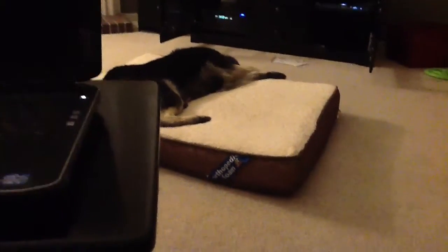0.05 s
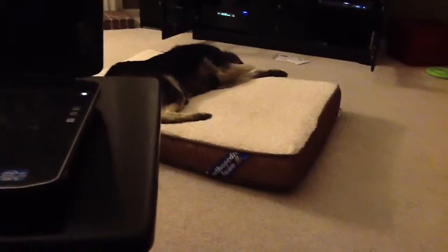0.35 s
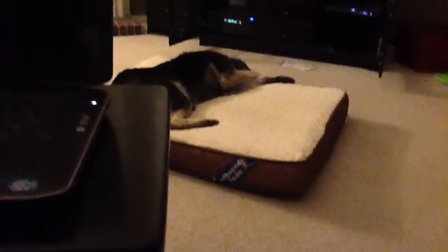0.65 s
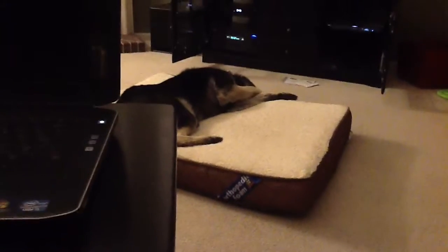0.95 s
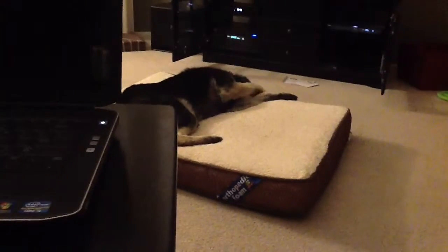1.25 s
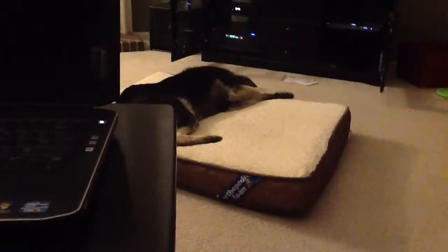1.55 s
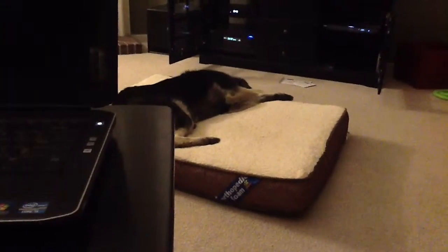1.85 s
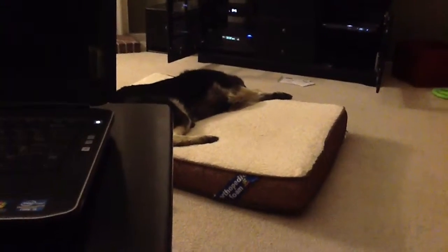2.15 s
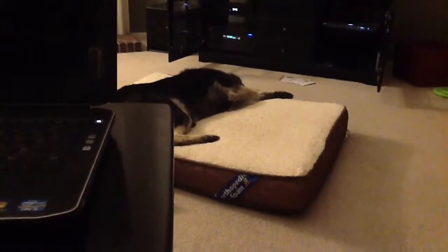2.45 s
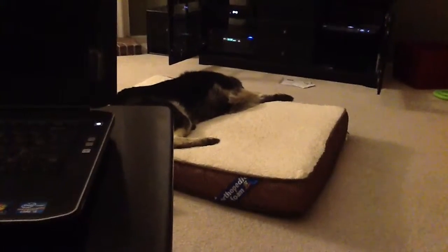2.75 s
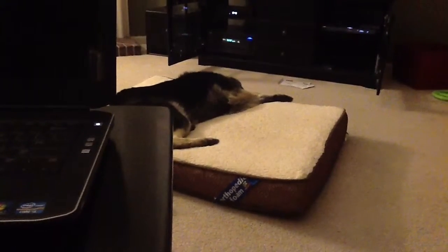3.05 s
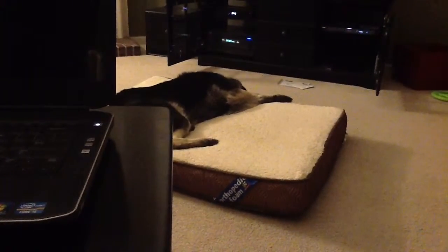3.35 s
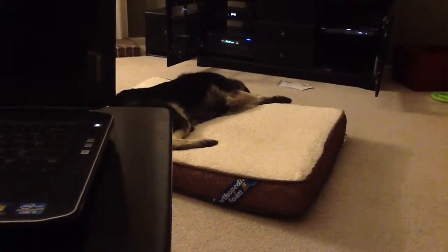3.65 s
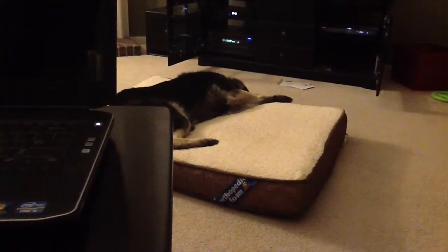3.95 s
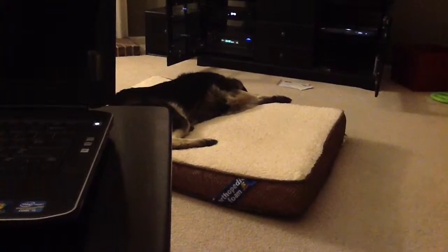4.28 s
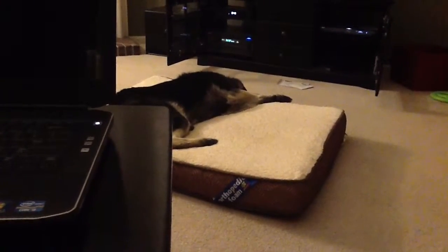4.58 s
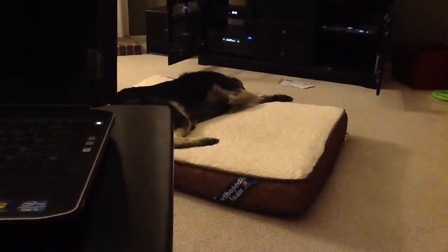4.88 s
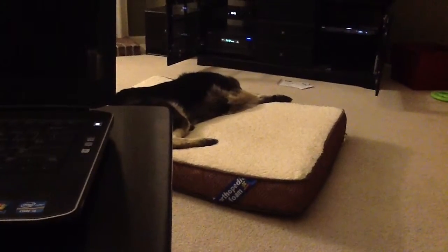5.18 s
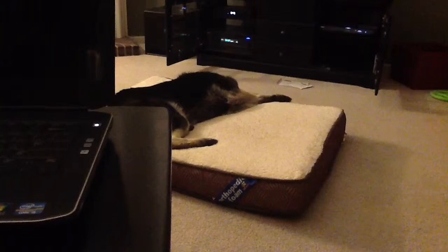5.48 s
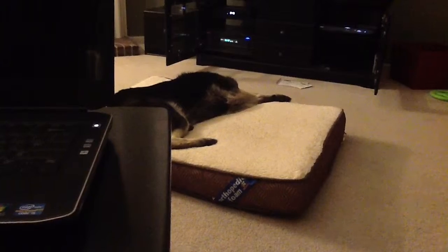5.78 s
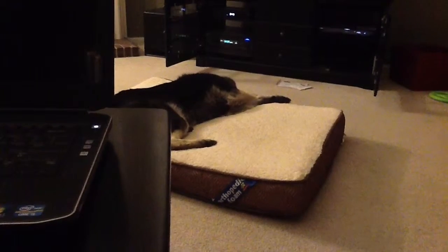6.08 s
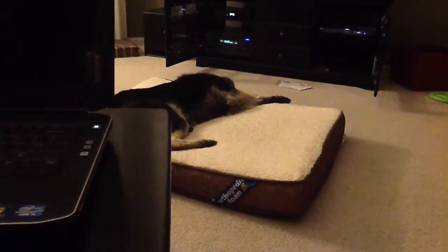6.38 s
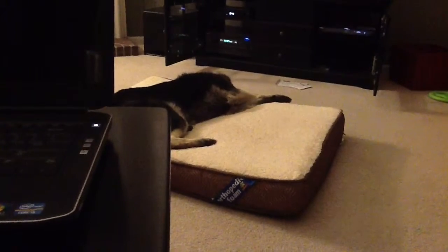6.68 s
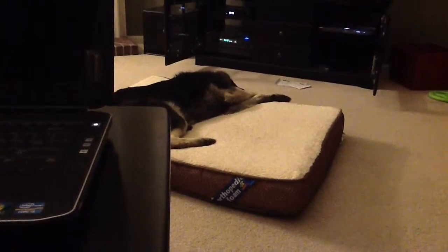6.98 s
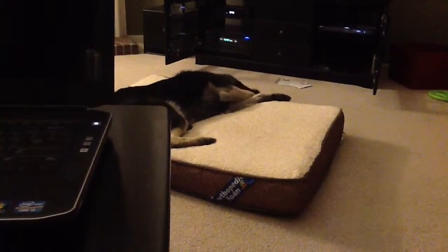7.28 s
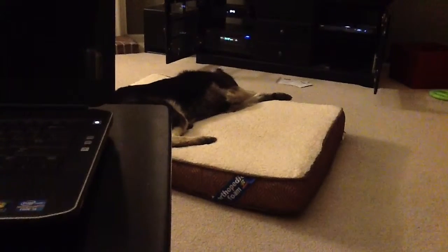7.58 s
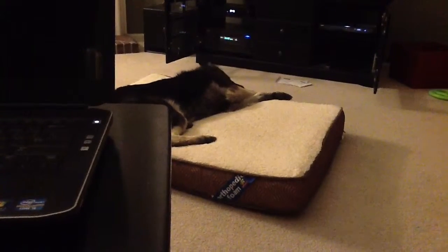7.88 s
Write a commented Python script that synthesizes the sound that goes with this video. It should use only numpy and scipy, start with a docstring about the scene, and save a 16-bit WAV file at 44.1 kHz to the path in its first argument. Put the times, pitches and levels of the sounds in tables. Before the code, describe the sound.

High rubber toy squeaks come in uneven pairs as a dog bites a ball, with brief air hisses and soft knocks.

```python
"""A carpeted living room, where a dog lying across the room chews a squeaky ball. Each bite drives air out
through one reed, and air sucked back in sounds a second one; pitch, strength and overtones follow the air
pressure. Some bites only hiss. The room smears the glides, and jaws and paws knock softly over the quiet murmur
of the house."""
import sys
import numpy as np
from scipy import signal
from scipy.fft import rfft, irfft, next_fast_len
from scipy.io import wavfile
from scipy.ndimage import map_coordinates

SR = 44100
rng = np.random.default_rng(int(sys.argv[2]) if len(sys.argv) > 2 else 0)


def pcm_store(signal):
    """Save signal as 16-bit PCM."""
    levels = np.round(np.clip(np.atleast_2d(signal), -1, 1) * 32767)
    wavfile.write(sys.argv[1], SR, levels.astype(np.int16).T)


N = 349713

# Colour of the room tone. Each row: frequency in Hz, relative density in dB.
ROOM_TONE_COLOUR = [(18, -68), (30, -27), (64, -27), (81, -15.5), (147, -1.5), (212, -4), (255, -1.5),
                    (283, -5.5), (322, -3.5), (377, -6.5), (602, -9), (1420, -13.5), (2000, -13.5),
                    (4610, -15), (15300, -15.5)]
# Decay of the room's tail. Each row: frequency in Hz, t60 in seconds.
TAIL_T60 = [(200, 0.78), (1000, 0.49), (3000, 0.51), (6000, 0.43), (12000, 0.2)]
# Knocks of jaws, paws and ball. Each row: start in seconds, level at the strike in dB, centre in Hz,
# width in octaves, t60 in seconds.
KNOCK_HITS = [(0.271, -58.5, 1870, 0.37, 0.055), (0.452, -54, 6000, 0.68, .015),
              (1.207, -56, 330, 0.45, 0.037), (1.845, -49.5, 330, 0.63, 0.021),
              (2.121, -43.5, 212, 0.33, 0.017), (2.359, -58, 980, 0.099, 0.028),
              (2.42, -55, 970, 0.23, 0.044), (3.455, -47.5, 430, 0.71, 0.015),
              (7.016, -54, 1080, 0.42, 0.031), (7.04, -57, 990, 0.57, 0.062),
              (7.204, -62, 139, 0.45, 0.091), (7.244, -61, 150, 0.9, 0.16), (7.332, -54.5, 400, 1, 0.1),
              (7.359, -54, 600, 0.48, 0.036), (7.378, -60, 400, 0.98, 0.068)]
# The dog shifts and rubs the ball. Each row: start and length in seconds, level in dB, centre in Hz,
# width in octaves.
RUB_STROKES = [(0, 0.17, -64, 665, 0.77), (0.239, 0.37, -71.5, 985, 1.2), (0.478, 0.076, -68, 324, 0.81),
               (0.795, 0.16, -70.5, 900, 1.1), (6.86, 0.078, -64.5, 636, 0.46),
               (7.114, 0.068, -61, 710, 0.22), (7.15, 0.098, -58, 1200, 0.09),
               (7.157, 0.14, -62.5, 550, 1.37), (7.11, .13, -63, 4470, 1.3)]
# Air rushing through the silent reed. Each row: start and length in seconds, level in dB,
# rise and fall in seconds.
AIR_PUFFS = [(1.206, 0.031, -48, 0.0044, .008), (1.227, 0.12, -44, 0.059, 0.018),
             (1.354, 0.059, -55.5, 0.0091, .02), (1.397, 0.11, -49.5, 0.041, 0.055),
             (1.498, 0.085, -50, 0.032, 0.04), (2.207, 0.082, -50, 0.036, 0.028),
             (2.263, 0.11, -52, 0.048, .03), (2.357, 0.064, -56.5, 0.0035, 0.022)]
# Colour of that hiss. Each row: frequency in Hz, relative density in dB.
PUFF_COLOUR = [(60, -48), (530, -18), (900, -17.5), (1210, -18.5), (1730, -13), (4900, -6.5), (5260, -5.5),
               (6140, -6), (8360, -1), (13400, -8.5), (15300, -10)]

# The jaw lets go and the flow turns round. Each row: start in seconds, opening level in dB.
RELEASE_CHIRPS = [(2.066, -46.5), (2.891, -47), (4.883, -50.5), (5.753, -44.5)]
# The ball springs back. Each row: start and rise in seconds, held pitch in Hz, hold, fall and surge delay
# in seconds, surge height in Hz, surge width in seconds, level and overtones in dB,
# brightness in dB per octave, jitter as a share of the pitch.
SLOW_REFILLS = [(2.084, .04, 2644, 0.041, 0.0034, .08, 750, .02, -47.5, -9, 0, .045),
                (2.917, .052, 2944, 0.02, 0.004, 0.071, 510, 0.013, -46, -8, -4.5, 0.01),
                (4.074, 0.0011, 1320, 0.048, 0.23, 0.045, 168.8, 0.027, -50.5, -5, 6.5, 0),
                (4.898, .032, 2600, .158, .19, .128, 600, .038, -47.5, -10.5, -1, 0),
                (5.776, 0.063, 2678, 0.17, .185, .186, 300, 0.016, -45, -10.5, -1, 0.01),
                (6.51, 0.043, 2122, .045, 0.17, 0.0582, 50.2, 0.019, -43, -9, -2, 0)]
# The ball snaps back at once. Each row: start in seconds, first pitch in Hz, fall in seconds,
# level and overtones in dB, brightness in dB per octave.
QUICK_GULPS = [(2.487, 2464, .056, -47, -8, 7), (3.487, 2476, 0.16, -50, -4, 7.5)]
# Strength of fundamental and overtones as air is drawn in. Each row: pitch in Hz, gain in dB.
INFLOW_FUNDAMENTAL = [(1130, -30), (1260, -11.5), (1420, -6.5), (1700, -5.5), (2000, 1), (2650, 0),
                      (3000, 2), (3500, -6)]
INFLOW_OVERTONES = [(1130, -43.5), (1260, -14.5), (1420, -8.5), (1700, -1), (2000, 0.5), (2700, 5),
                    (3400, -1.5)]

# Bites: the pitch climbs to a crest, then sinks as the jaw eases or leaps as the reed is overblown.
# Each row: start and climb in seconds, crest in Hz, climb bend, finish in seconds, end pitch in Hz,
# finish bend, level and its swell in the finish in dB, overtones and their change in the finish in dB,
# brightness in dB per octave, overblown rasp from 0 to 1. A bend under 1 moves early, over 1 late.
BITES = [(1.578, 0.067, 1478, 0.79, 0.055, 976, 1.01, -44, 0, -12.5, -2.5, -5.5, 0.3),
         (1.70, .118, 1394, 1.82, .046, 2846, 0.84, -45, -4.5, -13.5, 4, -4, 0),
         (2.562, 0.076, 1403, .85, 0.055, 2703, 0.49, -44.5, 0.5, -11, 0.5, -5.5, 0.05),
         (3.966, 0.044, 1180, 0.52, 0.055, 1021, 0.71, -45, 0, -10, -9.5, 3, 0),
         (4.457, .16, 1368, .36, .09, 2820, .95, -47.5, 1.5, -9.5, -4.5, -1, 0.02),
         (5.334, .05, 1398, 0.62, .063, 2792, .8, -43.5, 0.5, -10.5, 1, -5, .02),
         (6.312, 0.13, 1323, .6, 0.057, 998, 1.49, -44, -5, -10, 0, -6, 0),
         (7.8, .054, 1400, 1.2, 0.06, 2217, 0.14, -54.5, 13.5, 8.5, -11, -1, 0.13)]
# Strength of fundamental and overtones as air is pressed out; more pressure means a higher pitch.
# Each row: pitch in Hz, gain in dB.
OUTFLOW_FUNDAMENTAL = [(1000, -6), (1070, -4.5), (1170, -4), (1300, 0), (1430, -6), (1750, -6), (2050, -1),
                       (2700, 1)]
OUTFLOW_OVERTONES = [(1000, -13), (1070, -8), (1200, -5), (1330, -1.5), (1450, 1), (2000, .5), (2700, 3.5)]
# EQ on the overtones for each direction of flow. Each row: frequency in Hz, gain in dB.
INFLOW_COLOUR = [(2000, 10.5), (3000, 6), (4200, 1), (5500, -4.5), (7000, -8), (8000, -14.5), (9300, -5),
                 (11000, -5.5), (13100, -13), (14200, -38)]
OUTFLOW_COLOUR = [(2000, -2), (3000, 4.5), (4200, 2), (5500, 1), (7000, 4.5), (8000, 1), (9300, 4.5),
                  (10700, -4.5), (11800, -14.5), (15000, -24)]

ROOM_TONE_DB, TOP_HZ = -65, 15400
BITE_ONSET_HZ, SLACK_HZ = 1038, 1133  # where outgoing air starts the reed; where a refill relaxes to
RELAX = 2.8  # time constants in one fall
CHIRP_HZ, CHIRP_END_HZ, CHIRP_DROP_S, CHIRP_S = 1690, 1038, .0035, 0.017  # the drop is a time constant
CHIRP_FADE_DB_PER_S, CHIRP_OVERTONES_DB = 659, -9.5
BUILD_DB, BUILD_S = 4, 0.0041  # the overtones start this much weaker and catch up with the fundamental
WOBBLE, WOBBLE_RATE = 0.0038, 69.2  # the rubber gives unevenly: share of the pitch, knots a second
SHIMMER_DB, SHIMMER_RATE = 3.5, 55.6  # each overtone wavers on its own


def amp(db):
    """Decibels to gain."""
    return 10 ** (np.asarray(db) / 20)


def unit(x):
    """Scaled to rms 1."""
    return x / np.sqrt(np.mean(x ** 2) + 1e-20)


def along(points, hz):
    """A curve of (Hz, value) points read on a log frequency axis."""
    point_hz, values = np.transpose(points)
    return np.interp(np.log(hz + 1), np.log(point_hz + 1), values)


def filtered(x, response):
    """EQ by a gain that is a function of frequency."""
    size = next_fast_len(len(x) + 8192)
    return irfft(rfft(x, size) * response(np.fft.rfftfreq(size, 1 / SR)), size)[:len(x)]


def noise(colour):
    """A scene-long bed of coloured noise at rms 1."""
    return unit(filtered(rng.standard_normal(N), lambda hz: amp(along(colour, hz))))


def band(centre_hz, octaves):
    """Half a second of noise at rms 1 in a bell-shaped band."""
    bell = lambda hz: np.exp(-.5 * (np.log2((hz + 1) / centre_hz) / octaves) ** 2)
    return unit(filtered(rng.standard_normal(SR // 2), bell))


def flutter(t, rate):
    """A smooth random modulator, rate knots a second."""
    return map_coordinates(rng.standard_normal(4096), [t * rate], mode="wrap")


def clock(length):
    """Sample times of a sound this many seconds long."""
    return np.arange(round(length * SR)) / SR


def progress(t, start, length):
    """A ramp from 0 to 1 over one stage of a squeak."""
    return np.clip((t - start) / length, 0, 1)


def gate(t, length, rise, fall):
    """Fades in from t = 0 and is shut again at t = length."""
    return np.clip(t / rise, 0, 1) * np.clip((length - t) / fall, 0, 1)


def add(track, start, sound):
    """Mix a sound into the track at a start time in seconds."""
    part = track[max(round(start * SR), 0):][:len(sound)]
    part += sound[:len(part)]


def room(x, wet, early=0.058, early_t60=0.36, predelay=.005):
    """Direct sound, echoes off floor and furniture, a tail whose treble dies first; wet is a power share."""
    hz, t, spectrum = signal.stft(rng.standard_normal(SR * 3 // 4), SR, nperseg=256)
    decay = lambda t60: amp(-60 * t / t60) ** 2 * 2 * np.log(1000) / (t60 * SR)  # power over time, sum 1
    power = early * decay(early_t60) + (1 - early) * decay(along(TAIL_T60, hz)[:, None])
    echoes = signal.istft(spectrum * np.sqrt(power), SR, nperseg=256)[1]
    response = np.sqrt(wet) * np.pad(echoes, (round(predelay * SR), 0))
    response[0] = np.sqrt(1 - wet)
    return signal.fftconvolve(x, response)


def room_tone():
    """The bed: a steady murmur of the house under an even hiss."""
    return amp(ROOM_TONE_DB) * noise(ROOM_TONE_COLOUR)


def knocks_and_rubs():
    """Dull knocks and short rubs of the dog at work on the ball."""
    out, t = np.zeros(N), clock(.5)
    for start, db, hz, octaves, t60 in KNOCK_HITS:
        envelope = amp(-60 * t / t60) * (1 - np.exp(-t / 0.00035))
        rms = amp(db) * np.sqrt(np.mean(envelope ** 2))
        add(out, start, rms * unit(envelope * band(hz, octaves)))
    for start, length, db, hz, octaves in RUB_STROKES:
        swell = np.sin(np.pi * np.minimum(t / length, 1))
        add(out, start, amp(db) * swell * band(hz, octaves))
    low_cut = signal.butter(4, 90, "highpass", fs=SR, output="sos")
    return room(signal.sosfilt(low_cut, out), wet=0.28)[:N]


def puffs():
    """Air hisses through the squeaker when the reed does not catch."""
    t = np.arange(N) / SR
    flow = sum(amp(db) * gate(t - start, length, rise, fall) for start, length, db, rise, fall in AIR_PUFFS)
    return room(flow * noise(PUFF_COLOUR), wet=0.1)[:N]


def reed(pitch, level_db, overtones_db, brightness, colour, jitter, glide_jitter,
         overblown_hz, rasp, subharmonic_db, air_db, spit_db, catch_s):
    """One squeak: the reed chops the air stream into a gliding stack of harmonics."""
    t = clock(len(pitch) / SR)
    glide = np.minimum(np.abs(np.gradient(np.log2(pitch))) * SR, 20)  # octaves a second
    overblown = np.clip(pitch / overblown_hz - 1, 0, .5) * 2
    unsettled = np.exp(-t / catch_s)
    # the reed shakes while it catches, when the pressure changes fast, and when the pressure is too high
    shake = jitter + 0.022 * unsettled + glide_jitter * glide ** 2 + rasp * overblown
    pitch = pitch * (1 + shake * flutter(t, 700) + WOBBLE * flutter(t, WOBBLE_RATE))
    phase = 2 * np.pi * np.cumsum(pitch) / SR
    harmonics = np.arange(2, 15)[:, None]
    hz = harmonics * pitch
    build = amp(-BUILD_DB * np.exp(-t / BUILD_S))
    shimmer_db = SHIMMER_DB * np.array([flutter(t, SHIMMER_RATE) for _ in harmonics])
    eq_db = along(colour, hz) + brightness * np.log2(hz / 5000)
    gains = build * amp(overtones_db + shimmer_db + eq_db) * (hz < SR / 2)
    offsets = rng.uniform(0, 2 * np.pi, harmonics.shape)
    stack = np.sin(phase) + np.sum(gains * np.sin(harmonics * phase + offsets), axis=0)
    # overblown, strong and weak swings alternate
    stack *= 1 + overblown * amp(subharmonic_db) * np.sin(phase / 2 + flutter(t, 1100))
    leak = build * (amp(air_db + overtones_db) + amp(spit_db) * unsettled ** 2)
    air = leak * band(5700, 1.0)[:len(t)] * (1 + np.sin(phase))  # air passes while the reed is open
    envelope = amp(level_db + flutter(t, 198.2)) * gate(t, t[-1], rise=.003, fall=0.0035)
    return (np.sqrt(2) * stack + air) * envelope


def indrawn_reed(pitch, level_db, overtones_db, brightness, jitter):
    """Incoming air sounds the second reed in the room: a spitty attack, slower to catch than a bite."""
    tone = reed(pitch, level_db, overtones_db, brightness, INFLOW_COLOUR, jitter, glide_jitter=.00009,
                overblown_hz=2720, rasp=0.037, subharmonic_db=-18, air_db=-30, spit_db=-1, catch_s=0.017)
    return room(tone, wet=0.71, early=0.059)


def suction(lift_hz, db, overtones_db, brightness, jitter):
    """Suction lifts the pitch above the slack reed's, and the squeak's strength follows."""
    pitch = SLACK_HZ + lift_hz
    fundamental_db = along(INFLOW_FUNDAMENTAL, pitch)
    richness_db = overtones_db + along(INFLOW_OVERTONES, pitch) - fundamental_db
    return indrawn_reed(pitch, db + fundamental_db, richness_db, brightness, jitter)


def chirps():
    """A short falling chirp as the jaw lets go and the flow turns round."""
    out, t = np.zeros(N), clock(CHIRP_S)
    pitch = CHIRP_END_HZ + (CHIRP_HZ - CHIRP_END_HZ) * np.exp(-t / CHIRP_DROP_S)
    for start, db in RELEASE_CHIRPS:
        level_db = db - CHIRP_FADE_DB_PER_S * t
        add(out, start, indrawn_reed(pitch, level_db, CHIRP_OVERTONES_DB, brightness=.8, jitter=0.0025))
    return out


def refills():
    """The ball sucks air back in: the pitch shoots up, surges and relaxes, or just falls in one gulp."""
    out = np.zeros(N)
    for (start, rise, held_hz, hold, fall, surge_delay, surge_hz, surge_width,
         db, overtones_db, brightness, jitter) in SLOW_REFILLS:
        t = clock(rise + hold + fall)
        pull = (held_hz - SLACK_HZ) * progress(t, 0, rise)
        surge = surge_hz * np.exp(-.5 * ((t - surge_delay) / surge_width) ** 2)
        release = np.exp(-RELAX * progress(t, rise + hold, fall))
        add(out, start, suction((pull + surge) * release, db, overtones_db, brightness, jitter))
    for start, hz, fall, db, overtones_db, brightness in QUICK_GULPS:
        lift_hz = (hz - SLACK_HZ) * np.exp(-RELAX * clock(fall) / fall)
        add(out, start, suction(lift_hz, db, overtones_db, brightness, jitter=0.0017))
    return out


def bites():
    """The lead: a bite presses air out through the reed, clean at first, a screech once overblown."""
    out = np.zeros(N)
    for (start, climb, crest_hz, climb_bend, finish, end_hz, finish_bend,
         db, swell_db, overtones_db, change_db, brightness, rasp) in BITES:
        t = clock(climb + finish)
        climbing = progress(t, 0, climb) ** climb_bend
        finishing = progress(t, climb, finish) ** finish_bend
        pitch = BITE_ONSET_HZ + (crest_hz - BITE_ONSET_HZ) * climbing + (end_hz - crest_hz) * finishing
        fundamental_db = along(OUTFLOW_FUNDAMENTAL, pitch)
        level_db = db + fundamental_db + swell_db * finishing
        richness_db = overtones_db + change_db * finishing + along(OUTFLOW_OVERTONES, pitch) - fundamental_db
        tone = reed(pitch, level_db, richness_db, brightness, OUTFLOW_COLOUR, jitter=0.00072,
                    glide_jitter=.00002, overblown_hz=1453, rasp=rasp, subharmonic_db=-21,
                    air_db=-32, spit_db=-25, catch_s=0.00083)
        add(out, start, room(tone, wet=0.71, early=0.056))
    return out


def scene():
    """The mono mix: squeaks up front, hiss and knocks beneath, room tone behind."""
    return (bites() + refills() + chirps() + puffs() + knocks_and_rubs() + room_tone())[None]


def record(dry):
    """A brick-wall high cut takes off the very top."""
    return np.array([filtered(channel, lambda hz: hz < TOP_HZ) for channel in dry])


dry = scene()
out = record(dry)
pcm_store(out)
```